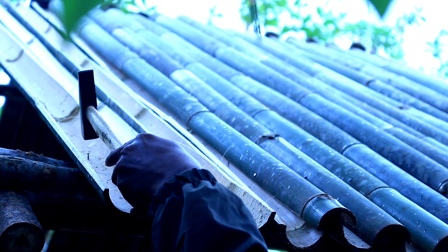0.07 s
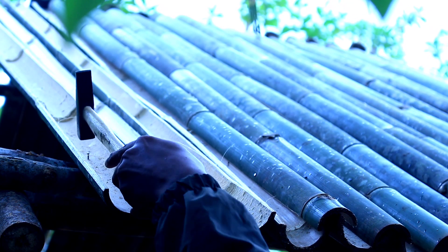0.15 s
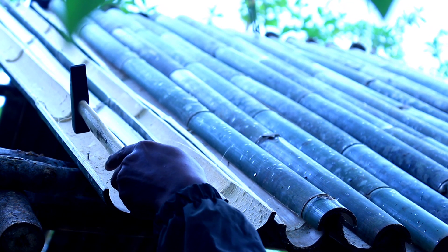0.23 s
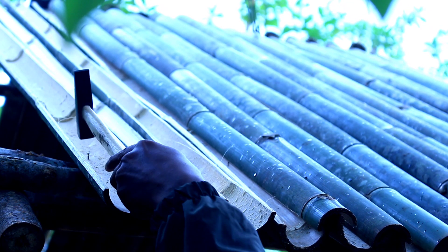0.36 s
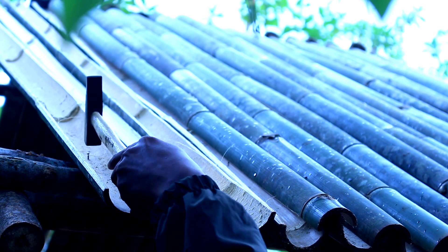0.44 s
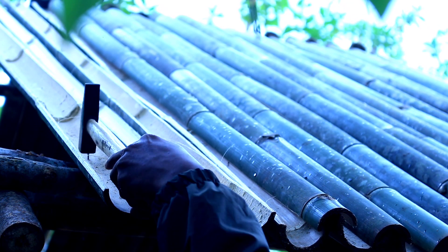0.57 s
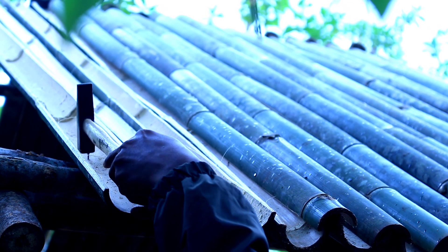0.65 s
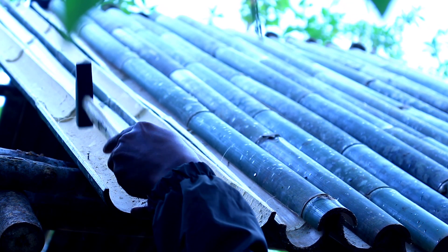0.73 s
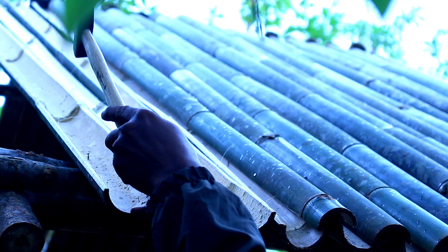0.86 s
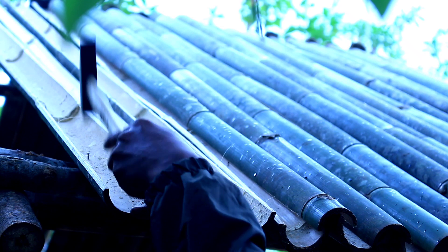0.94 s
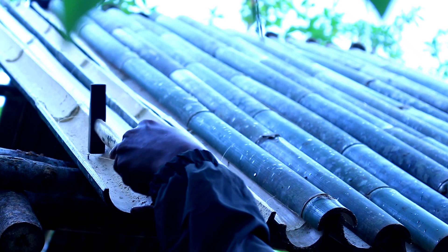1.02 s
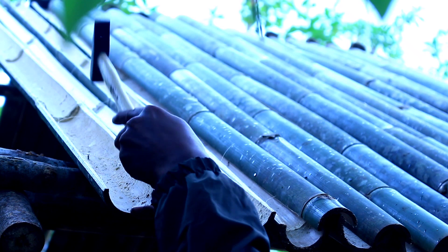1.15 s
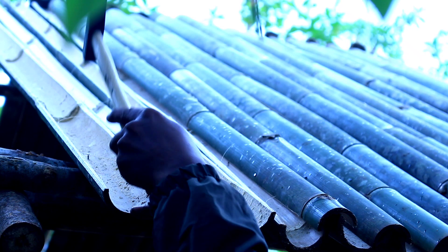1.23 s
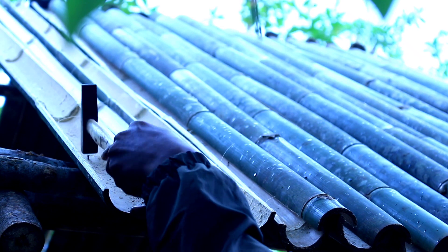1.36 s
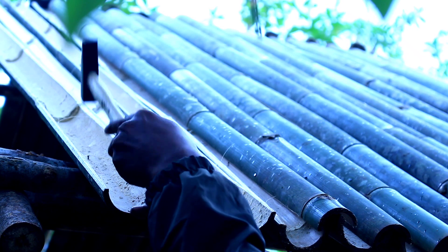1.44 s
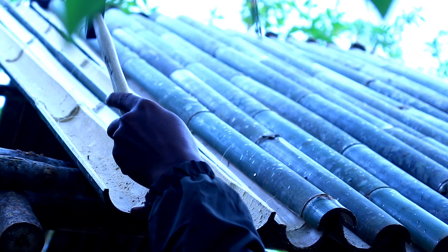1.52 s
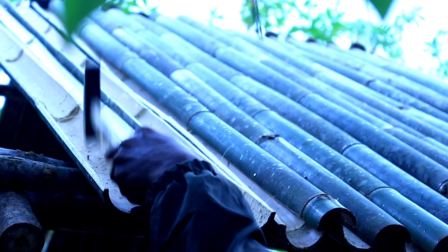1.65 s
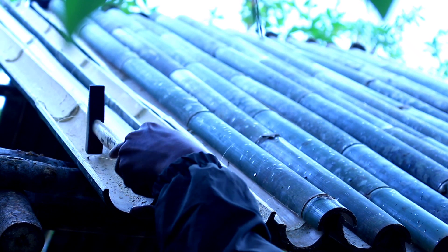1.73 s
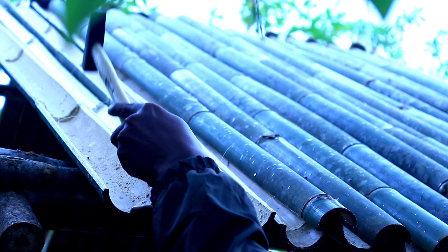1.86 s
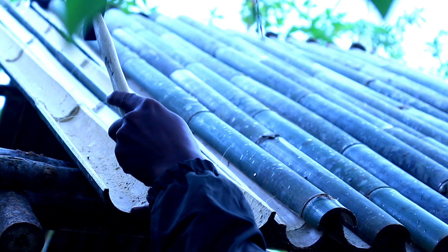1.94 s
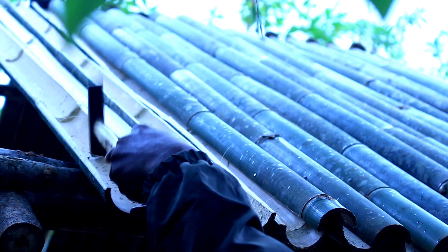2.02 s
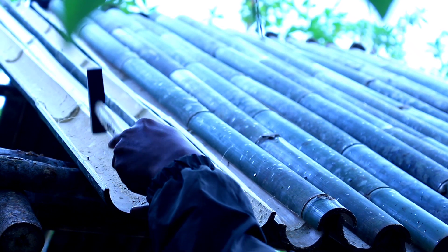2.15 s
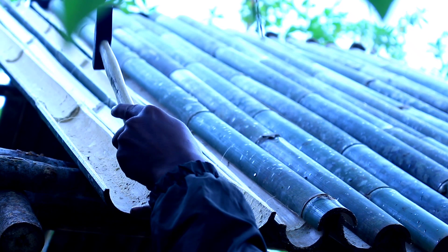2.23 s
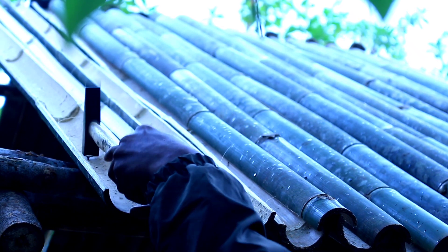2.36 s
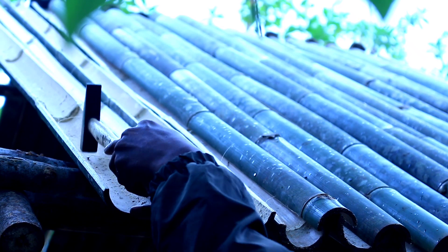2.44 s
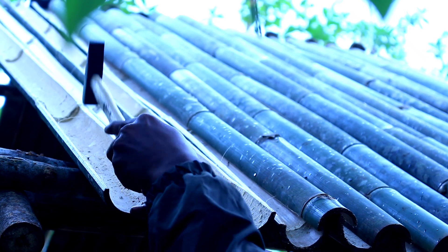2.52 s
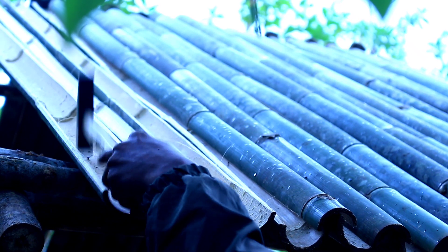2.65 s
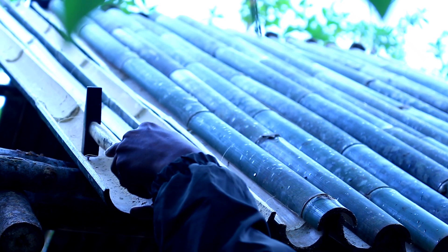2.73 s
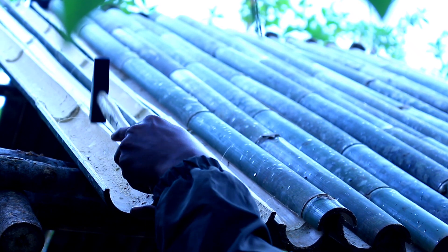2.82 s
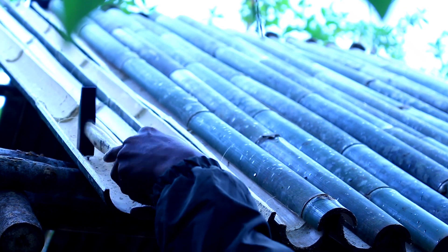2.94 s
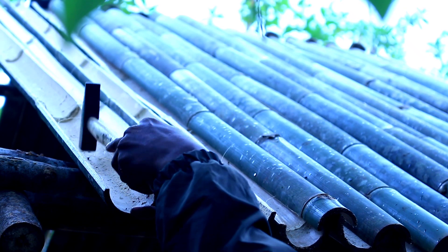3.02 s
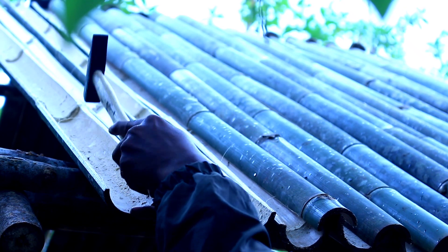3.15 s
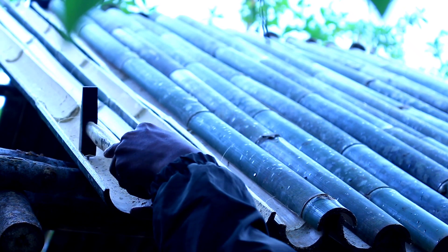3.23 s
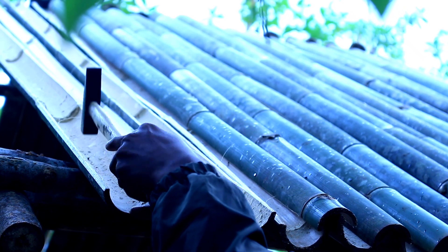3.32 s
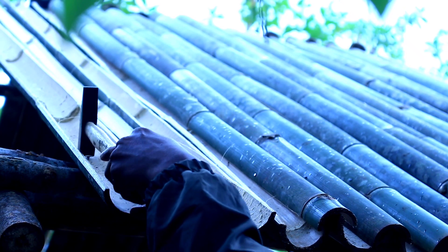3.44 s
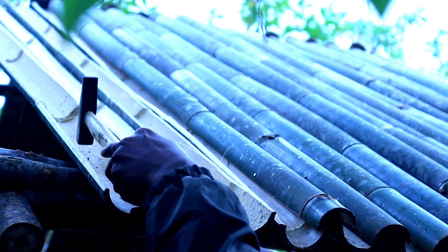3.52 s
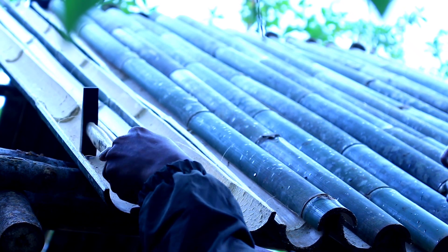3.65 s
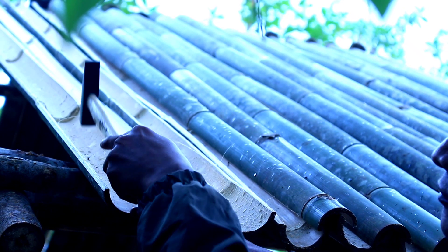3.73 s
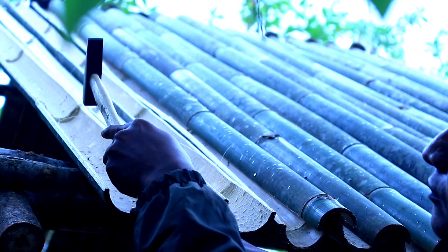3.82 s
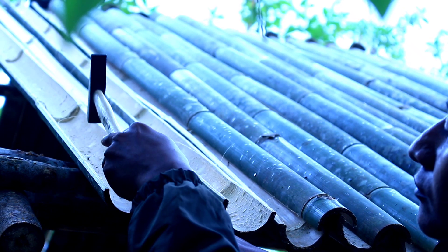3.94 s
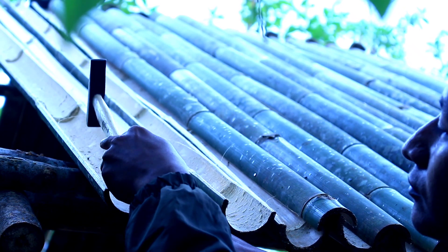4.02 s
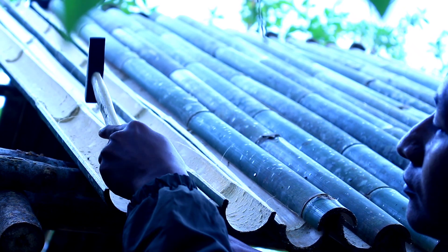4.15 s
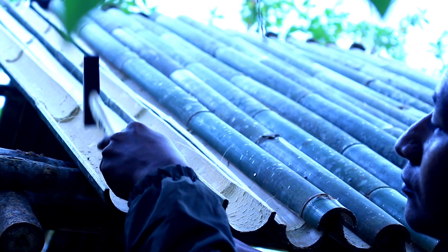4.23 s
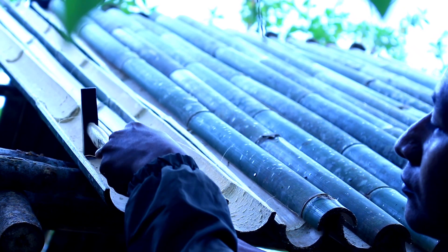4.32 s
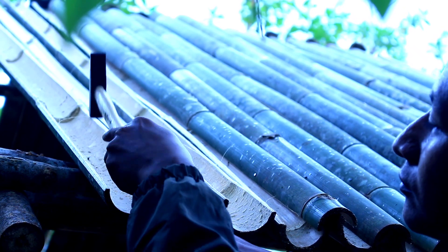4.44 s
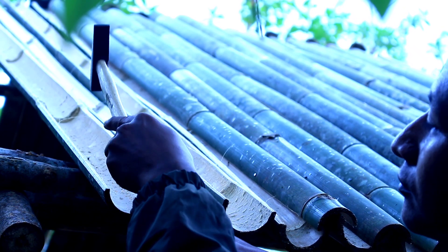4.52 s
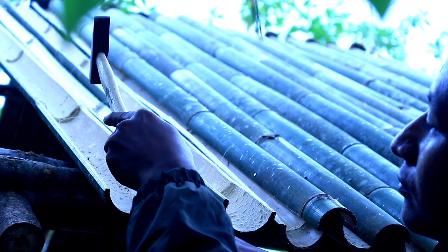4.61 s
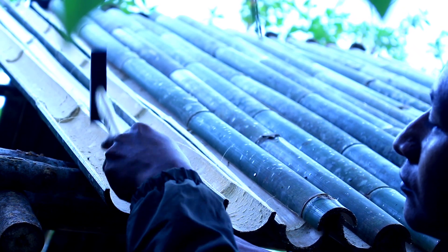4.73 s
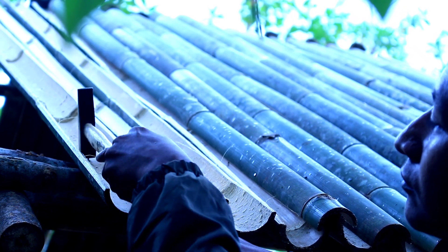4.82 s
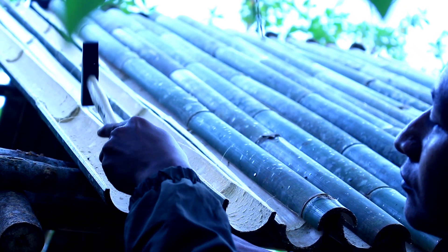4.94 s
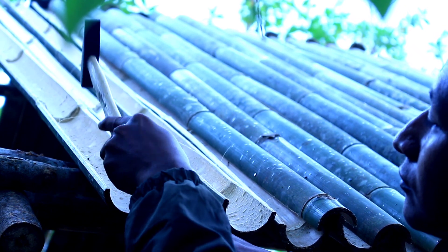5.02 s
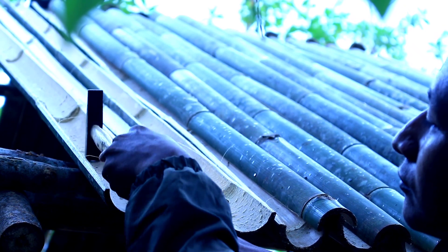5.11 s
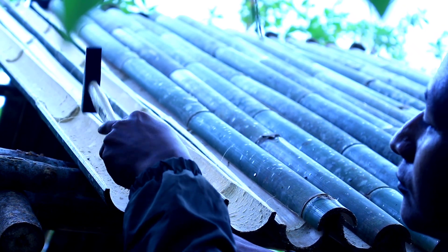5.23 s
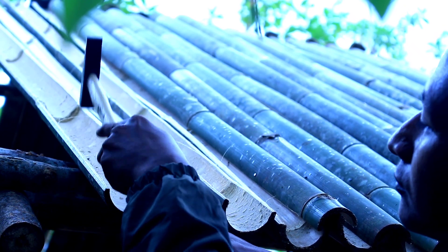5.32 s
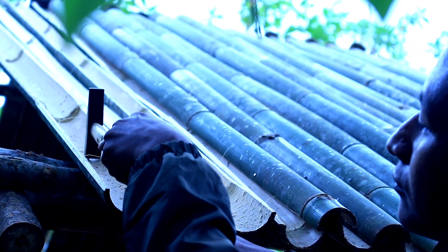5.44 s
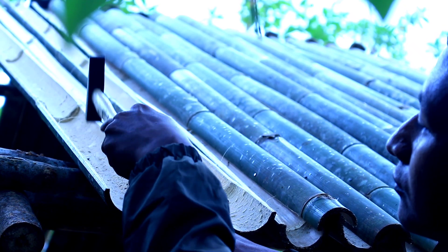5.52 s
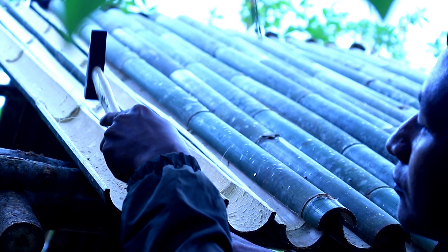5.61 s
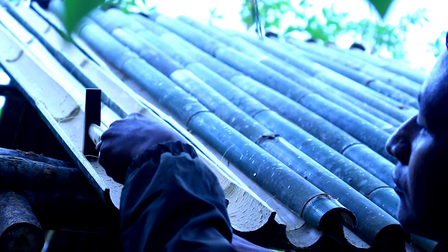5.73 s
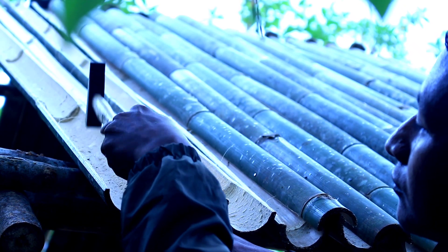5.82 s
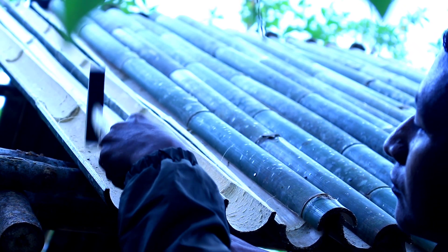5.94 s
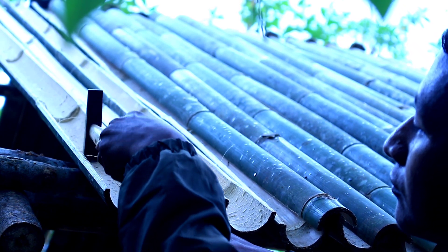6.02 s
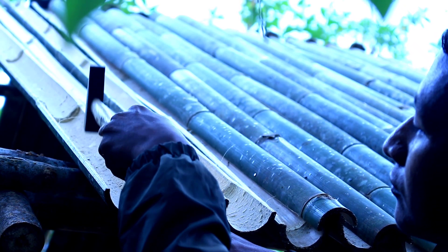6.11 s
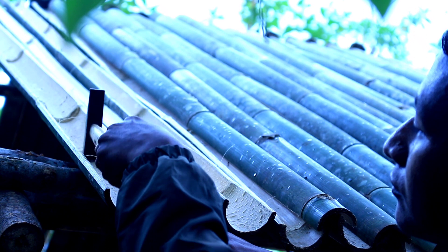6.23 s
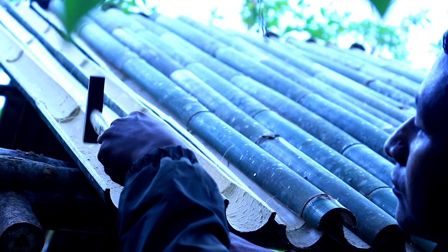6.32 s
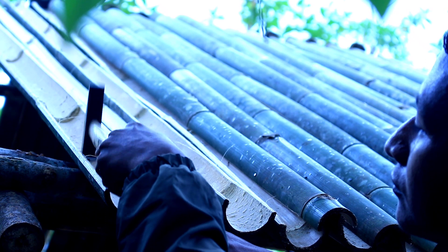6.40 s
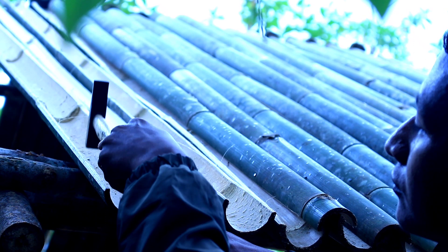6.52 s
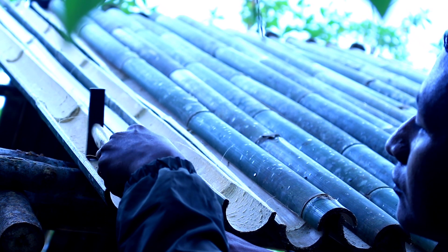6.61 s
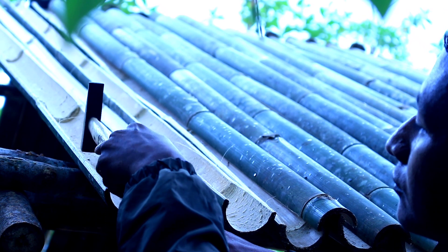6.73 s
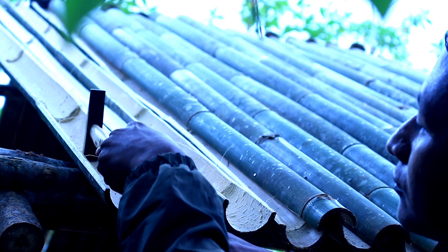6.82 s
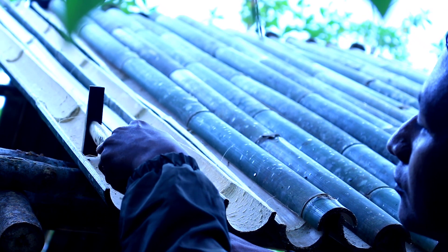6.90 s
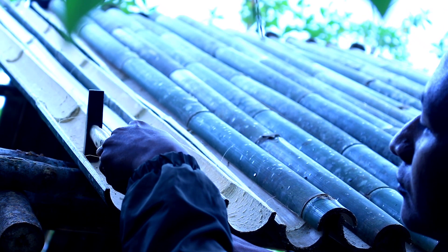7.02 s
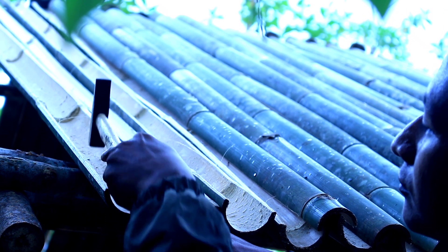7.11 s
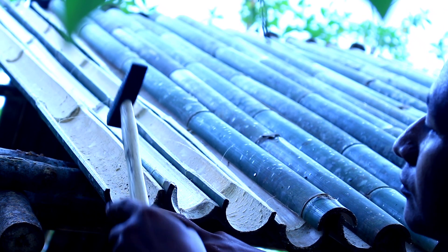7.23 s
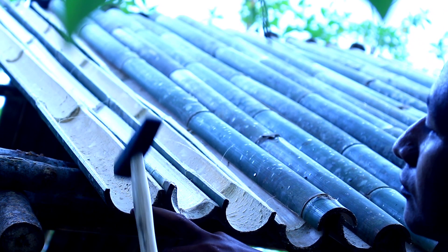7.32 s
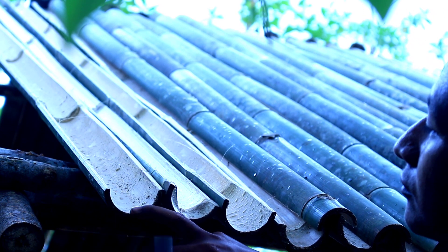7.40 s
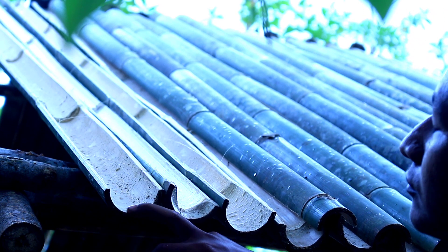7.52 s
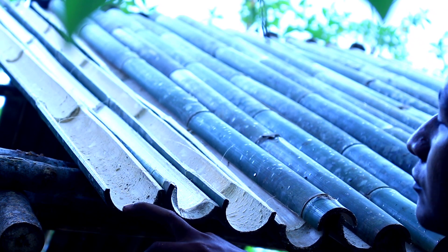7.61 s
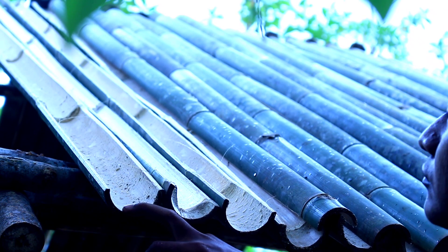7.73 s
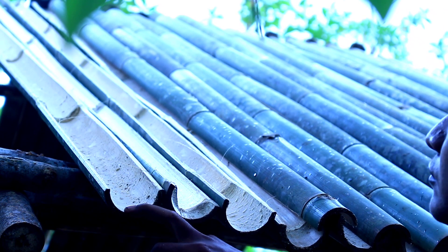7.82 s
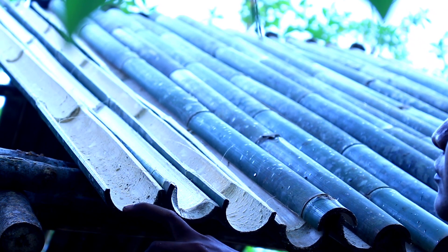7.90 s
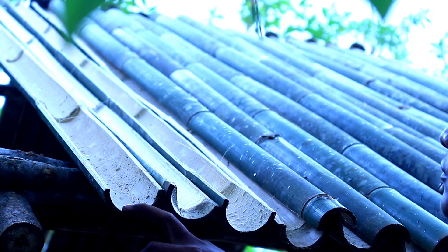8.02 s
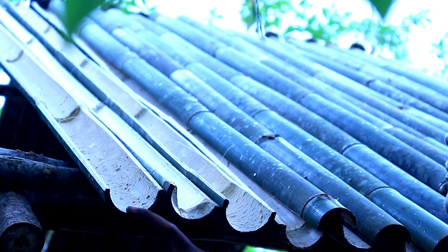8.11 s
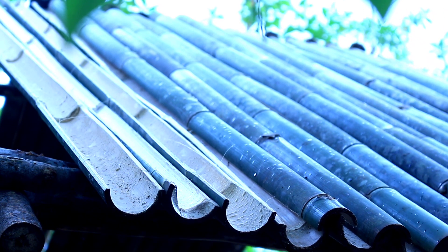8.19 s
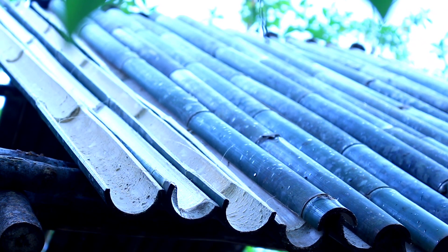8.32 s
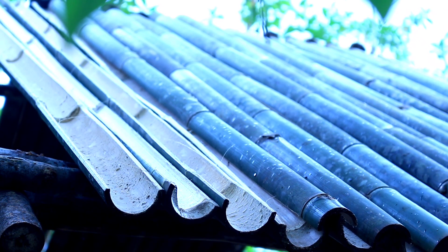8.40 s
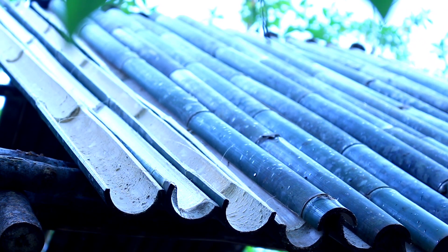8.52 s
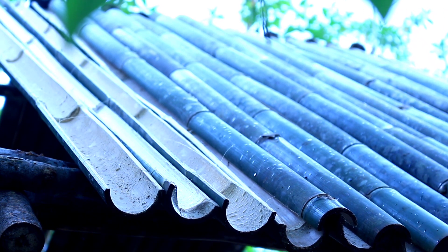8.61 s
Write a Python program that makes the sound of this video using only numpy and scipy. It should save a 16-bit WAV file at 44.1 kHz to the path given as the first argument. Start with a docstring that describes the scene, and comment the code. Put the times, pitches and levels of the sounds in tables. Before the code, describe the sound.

A steel hammer knocks sharply on a split bamboo roof in two runs, hollow stems ringing and strips clapping, ending in loose taps outdoors.

```python
"""A steel hammer knocks on a roof of split bamboo at arm's length, in two runs of blows that end in loose taps.
Each blow adds a sharp crack, the ring of hollow culms (bamboo stems) and a shudder of the roof, built from
decaying sine waves and filtered noise. A weaker ring lingers under the eaves, and loose strips clap back.
Behind it, narrow bands of noise make a thin insect trill and a far hum, and broad noise a quiet outdoor hush."""
import sys
import numpy as np
from scipy import signal
from scipy.fft import rfft, irfft, next_fast_len
from scipy.io import wavfile

SR = 44100
rng = np.random.default_rng(int(sys.argv[2]) if len(sys.argv) > 2 else 0)


def transcribe(u):
    """Save the signal u as a 16-bit wav file named by the first command-line argument.

    u: samples, shape (n,) or (channels, n), limited to [-1, 1]; the rate is SR.
    q: integer samples, one column per channel.
    """
    v = np.clip(np.atleast_2d(u).T, -1, 1)
    q = np.round(v * 32767).astype(np.int16)
    wavfile.write(sys.argv[1], SR, q)


N = 381906  # samples in the scene
RING = 22000  # samples in one ring
AGE = np.arange(RING) / SR  # seconds since a ring began


def undb(db):
    """Turn decibels into gain."""
    return 10 ** (np.asarray(db) / 20)


def unit(x):
    """Scale a sound so that the average of its channels has an energy of one."""
    mono = np.atleast_2d(x).mean(axis=0)
    return x / np.sqrt(np.sum(mono ** 2))


def fade(t60):
    """Exponential decay over one ring; it falls by 60 dB in t60 seconds."""
    return np.exp(-np.log(1000) * AGE / t60)


def colour(x, points):
    """Filter a sound through (hz, db) points without any sound ahead of its start (minimum phase)."""
    size = next_fast_len(2 * x.shape[-1])
    size += size % 2
    hz, db = np.transpose(points)
    bin_hz = np.arange(size // 2 + 1) * SR / size
    gain_db = np.interp(np.log(bin_hz + 1), np.log(hz), db)
    # folding the cepstrum (the spectrum of the log gain) forward in time gives the matching phase
    cepstrum = irfft(np.log(undb(gain_db)))
    cepstrum[1:size // 2] *= 2
    cepstrum[size // 2 + 1:] = 0
    response = np.exp(rfft(cepstrum))
    return irfft(rfft(x, size) * response)[..., :x.shape[-1]]


def diffuse(size, apart_hz):
    """Noise from all around: more alike in both channels in the bass, unrelated above apart_hz."""
    mid, side = rng.standard_normal((2, size))
    side = colour(side, [(apart_hz / 10, -14), (apart_hz, 0)])
    return np.array([mid + side, mid - side])


def uneven(depth_db, rate_hz):
    """Random gain over one ring, with a new target rate_hz times a second."""
    targets = rng.standard_normal(RING)
    return undb(depth_db * np.interp(AGE * rate_hz, np.arange(RING), targets))


def add(track, s, sound):
    """Mix a sound into the track at time s in seconds."""
    start = max(int(s * SR), 0)
    part = sound[..., :N - start]
    track[:, start:start + part.shape[-1]] += part


def hammering(culms_db=-3.0, contact_db=-5.0, steel_db=-18.5, roof_db=-5, eaves_db=-11, frame_db=-26,
              rest_t60=2.36, renewed=0.76, opening_db=-11, full_blow_db=15, left_over_right_db=4):
    """Every blow excites the same roof; a hard, square hit is brighter than a glancing tap."""
    out = np.zeros((2, N))
    roof, eaves = shudder(), linger()
    for s, db, tone, crack_db, ring_db in strikes():
        contact = undb(crack_db) * (undb(contact_db) * crack() + undb(steel_db) * steel())
        # the roof answers each blow alike, but its loose strips never settle in quite the same way
        body = undb(culms_db) * culms() + undb(roof_db) * unit(roof + renewed * shudder())
        tail = undb(eaves_db + ring_db) * unit(eaves + renewed * linger())
        tail = tail + undb(frame_db) * frame_thud()
        # after a light tap the head stays on the bamboo and damps it
        damping = fade(rest_t60 * undb(db))
        blow = unit((contact + body * bloom() + tail) * damping)
        add(out, s, undb(full_blow_db + db) * colour(blow, tone))
    # an earlier blow is still dying away at the start
    fading = linger(swell_s=0.00029) + 0.19 * steel() + 0.56 * frame_thud()
    add(out, 0, undb(opening_db) * colour(fading, [(100, -7), (500, -6), (3000, -2.5)]))
    return out * undb(np.array([[left_over_right_db], [-left_over_right_db]]) / 2)


def strikes(blow_ring_db=3, clap_crack_db=-4, clap_ring_db=5):
    """Give each blow and clap its time, strength, colour, crack and ring; aim and contact set a blow's colour."""
    # hammer blows: start_s, strength_db, hollowness_db (over the open middle of a culm),
    # dullness_db (treble lost in a glancing contact), crack_db
    blows = [(0.6543, -14, 3.5, 14, -9), (1.034, 0.5, -0.5, -0.5, 0.5), (1.3837, 0.85, -0.5, -1.5, 1),
             (1.7423, 0.5, -0.5, -1.5, 1.5), (2.0932, 1, 1.5, 17, -5), (2.4542, 1.5, 0, 3.5, 2.5),
             (2.7394, -1, 1, 11, -8), (3.0154, 0.5, 3.5, 6.5, 5), (3.268, -1, 5.5, 7.5, 0.5),
             (3.4923, -7, -1.5, 15.5, -18), (3.669, -10.5, -2, 20, -8), (4.3629, -1.1, 2.7, 13, -2.5),
             (4.8429, 0, 2.5, 1, 1), (5.153, -0.5, 1, -4, 1), (5.4526, 0, 6, 5.5, 1),
             (5.7475, 0, 1, -1.5, 2), (6.0251, 1, 2.5, 1.5, 2.5), (6.2858, -0.5, 5.5, 13, -1),
             (6.4985, -1.5, 7, 9, 2.5), (6.6817, -10, 0, 18, -7), (6.8529, -21, -2, 18, -7),
             (6.9959, -9, 6.5, 9, -4.5)]
    # the colour of a blow; a light tap moves only the strip it lands on, so the middle stands out:
    # pitch_hz, square_full_blow_db, then change in dB per dB of hollowness, of dullness, of lost strength
    tilt = [(35, 2.5, -.2, 0, 0.5), (75, -10, -0.4, 0.66, -0.05), (131.5, 1, -0.14, -0.01, 0.56),
            (188, -5, -0.06, -0.04, 0), (268, 2, -0.35, 0.2451, -0.47), (417, 0, -0.28, 0, 0),
            (628, -3, 1.15, 0, 0), (900, -1.5, 1.04, 0, 0.21), (1360, 0.07, 0.87, -0.16, 0.5),
            (1980, -0.46, 0.71, 0, 0.14), (3930, -1, -0.03, -0.3235, 0), (5600, 1, 0, -0.41, 0),
            (9070, 0.63, 0, -1.02, 0)]
    # a loose strip claps back against its neighbour after a glancing blow: start_s, strength_db
    claps = [(2.102, -10), (2.114, -2), (2.166, -8), (2.179, -18), (2.218, -20.5), (2.266, -23.5),
             (2.7479, -2), (3.502, -5.5), (3.677, -10), (6.709, -9.5), (6.871, -12)]
    # the colour of a clap: pitch_hz, level_db
    clap_colour = [(75, -11.5), (280, 3.5), (450, 1.5), (800, -2), (1500, -0.5), (4100, -13.5), (9000, -21)]
    for s, db, hollow, dull, crack_db in blows:
        tone = []
        for hz, square, by_hollow, by_dull, by_light in tilt:
            tone.append((hz, square + hollow * by_hollow + dull * by_dull - db * by_light))
        yield s, db, tone, crack_db, blow_ring_db
    for s, db in claps:
        yield s, db, clap_colour, clap_crack_db, clap_ring_db


def crack(detune=0.012, rise_s=0.00013, far_port=.85):
    """The first sharp snap of steel on bamboo: short sine waves that start almost at once."""
    # the hammer's contact on the hard skin of the bamboo: pitch_hz, level_db, t60_s
    contact_modes = [(665, 0.5, 0.023), (1460, -12, 0.0094), (2258, 0.5, 0.0061), (3200, -4.5, 0.018),
                     (3790, 2.5, 0.027), (4156, 1, 0.012), (5564, -3.5, 0.011), (7150, -10, 0.017),
                     (9350, -8, 0.0092), (13900, -20, 0.0032)]
    snap = 0
    for k, (hz, db, t60) in enumerate(contact_modes):
        pitch = hz * (1 + detune * rng.standard_normal())
        wave = np.sin(2 * np.pi * pitch * AGE)
        mode = unit(wave * fade(t60) * (1 - np.exp(-AGE / rise_s)))
        # neighbouring bending modes swing in opposite directions
        snap = snap + (-1) ** k * undb(db) * mode
    return unit(np.array([snap, far_port * snap]))


def steel():
    """The hammer rings on thinly after it springs back: a few high sine waves that decay slowly."""
    # the steel head's thin after-ring: pitch_hz, level_db, t60_s
    head_modes = [(3243, 0, .42), (3360, -1, .38), (4405, -13, .3)]
    out = 0
    for hz, db, t60 in head_modes:
        wave = np.sin(2 * np.pi * (hz * AGE + rng.random()))
        out = out + undb(db) * wave * fade(t60)
    return unit(out)


def culms(detune=0.0085, scatter_db=1.0, swell_s=0.0064, port_rad=0.35):
    """Neighbouring culms ring at slightly different pitches; each blow lands elsewhere and weights them anew."""
    # what the culms ring with: pitch_hz, level_db, t60_s
    culm_modes = [(139.5, -16.5, 0.033), (238, -16.5, 0.06), (291.7, -19, 0.35), (411.8, -4.5, 0.21),
                  (449.6, -4, 0.16), (521.4, -6, 0.27), (577.3, -7, 0.27), (639.7, -4, 0.099),
                  (680.6, -4.5, 0.27), (813.3, -2, 0.14), (876.4, -0.5, 0.14), (946, -0.5, 0.086),
                  (1060, -7.5, 0.13), (1104.5, -4.5, 0.15), (1212, -6.5, 0.14), (1325, -3, 0.073),
                  (1390, -5.5, 0.24), (1509, -2.5, 0.1), (1578, -2, 0.11), (1660, -14, 0.22),
                  (1790, -4.5, 0.052), (1967, -2.5, 0.15), (1960, -7.5, 0.023), (2244, -4, 0.081),
                  (2410, -6, 0.16), (2663, -16.5, 0.078)]
    half = RING // 2
    out = 0
    for hz, db, t60 in culm_modes:
        pitch = hz * (1 + detune * rng.standard_normal((2, 1)))
        phase = 2 * np.pi * rng.random() + rng.standard_normal((2, 1))
        wave = np.exp(1j * (2 * np.pi * pitch * AGE[:half] + phase)).sum(axis=0)
        wave = wave * (fade(t60) * (1 - np.exp(-AGE / swell_s)))[:half]
        # each microphone port hears the pair at a slightly different phase
        ports = np.exp(1j * port_rad * rng.standard_normal((2, 1)))
        out = out + unit((ports * wave).imag) * undb(db + scatter_db * rng.standard_normal())
    return np.pad(unit(out), ((0, 0), (0, half)))


def shudder(t60=0.11, spread_s=0.025, first=0.7, chatter_db=2, rattle_hz=500):
    """The shock spreads over the strips within milliseconds; they chatter unevenly and die fast."""
    # the roof's dense, short resonances: pitch_hz, level_db
    roof_colour = [(30, -47), (70, -8), (130, -10.5), (190, -16), (260, -3), (600, -15.5), (1000, -13),
                   (1900, -1), (2900, -5), (4200, -6.5), (6000, -16.5), (10000, -19.5), (13000, -33),
                   (16000, -43)]
    swell = first + (1 - first) * np.minimum(AGE / spread_s, 1) ** 2
    chatter = uneven(chatter_db, rattle_hz)
    return unit(colour(diffuse(RING, 7500) * swell * chatter * fade(t60), roof_colour))


def bloom(at_s=0.011, width_s=0.0024, lift_db=4):
    """The shock reaches the poles a moment after the contact, and the whole roof swells briefly."""
    return undb(lift_db * np.exp(-((AGE - at_s) / width_s) ** 2))


def linger(t60=0.49, swell_s=0.017, flutter_db=2, flutter_hz=250):
    """Poles and eaves hold a weak, longer ring that returns in uneven bursts."""
    # the ring under the eaves: pitch_hz, level_db
    eaves_colour = [(40, -7), (90, -0.5), (190, -0.5), (300, 1.5), (800, 4), (2000, 3), (4000, 2.5),
                    (6000, -4), (10000, -10.5), (13000, -24), (16000, -58)]
    flutter = uneven(flutter_db, flutter_hz)
    swell = 1 - np.exp(-AGE / swell_s)
    return unit(colour(diffuse(RING, 6200) * flutter * swell * fade(t60), eaves_colour))


def frame_thud(hz=132, t60=0.99):
    """The pole frame hums low after a blow: decaying noise, strongest around one low pitch."""
    hump = [(hz / 4, -22), (hz / 1.84, -10), (hz, 0), (hz * 1.55, -12), (hz * 4, -35)]
    return unit(colour(diffuse(RING, 1500) * fade(t60), hump))


def touches(t60=.14, rise_s=0.0064):
    """Soft brushes of hand and sleeve on the frame: short noises, each strongest around its own pitch."""
    # faint touches as the hand withdraws: start_s, pitch_hz, level_db
    brushes = [(7.801, 960, -54), (7.894, 1500, -63), (8.015, 120, -60), (8.205, 3480, -50)]
    out = np.zeros((2, N))
    for s, hz, db in brushes:
        brush = colour(diffuse(RING, 5000), [(hz / 4, -16), (hz, 0), (hz * 1.4, -12), (hz * 4, -45)])
        envelope = fade(t60) * np.minimum(AGE / rise_s, 1)
        add(out, s, undb(db) * brush / brush.std() * envelope)
    return out


def narrow(hz, pass_width_hz, size):
    """Separate noise for each channel, sent twice through one resonance and scaled to an rms of one."""
    b, a = signal.iirpeak(hz, hz / pass_width_hz, fs=SR)
    x = rng.standard_normal((2, size))
    for _ in range(2):
        x = signal.lfilter(b, a, x)
    return x / x.std()


def insects(trill_db=-68.5, attack_s=0.13, release_s=0.4, shrill_db=-83):
    """Insects trill in phrases on two close pitches, with a steady shriller one: narrow bands of noise."""
    # the phrases start quickly and trail off: start_s, end_s
    phrase_times = [(.08, 2.2), (2.5, 4.45), (4.55, 7.6), (7.5, 8.9)]
    # the insects' pitches: first_hz, second_hz, shrill_hz
    first_hz, second_hz, shrill_hz = (5780, 6060, 10060)
    t = np.arange(N) / SR
    phrases = 0
    for start, end in phrase_times:
        phrases = phrases + np.clip(np.minimum((t - start) / attack_s, (end - t) / release_s), 0, 1)
    trill = narrow(first_hz, 380, N) + narrow(second_hz, 160, N) / 2
    return trill * undb(trill_db) * phrases + undb(shrill_db) * narrow(shrill_hz, 220, N)


def outdoors(hush_db=-57.5, hum_db=-75, hum_hz=329):
    """A steady hush of broad noise and a far low hum of narrow noise."""
    # the colour of the outdoor hush: pitch_hz, level_db
    hush_colour = [(25, -4), (60, 2.5), (120, 1), (300, 0.5), (450, -0.5), (600, -2.5), (1000, -4),
                   (2000, -6.5), (3400, -9.5), (5000, -12.5), (7000, -16), (10000, -16.5), (15000, -25)]
    hush = colour(diffuse(N, 500), hush_colour)
    hush = hush / hush.mean(axis=0).std() * undb(hush_db)
    return hush + undb(hum_db) * narrow(hum_hz, 6.8, N)


def scene():
    """Hammer and surroundings."""
    return hammering() + touches() + insects() + outdoors()


def record(dry, top_hz=15500):
    """Each microphone port rolls off the bass; the recorder rounds the highest peaks and cuts the top."""
    # where each port's bass starts to fall: left_hz, right_hz
    corners = (121, 71)
    ports = []
    for x, hz in zip(dry, corners):
        bass_cut = signal.butter(2, hz, "high", fs=SR, output="sos")
        ports.append(signal.sosfilt(bass_cut, x))
    ports = np.array(ports)
    rounded = ports / (1 + ports ** 6) ** (1 / 6)
    top_cut = signal.ellip(8, .2, 70, top_hz, fs=SR, output="sos")
    return signal.sosfilt(top_cut, rounded)


dry = scene()
out = record(dry)
transcribe(out)
```